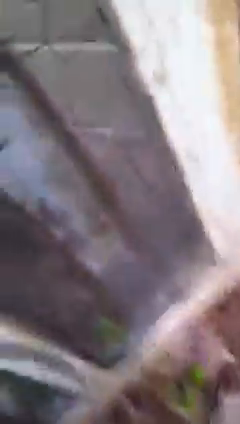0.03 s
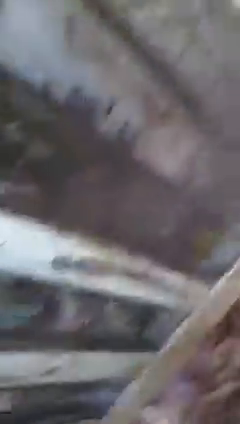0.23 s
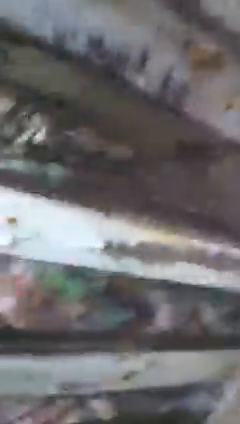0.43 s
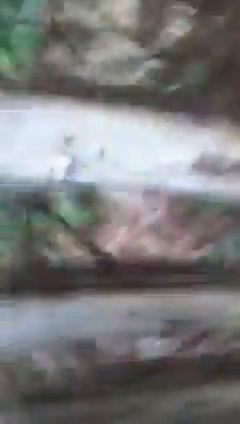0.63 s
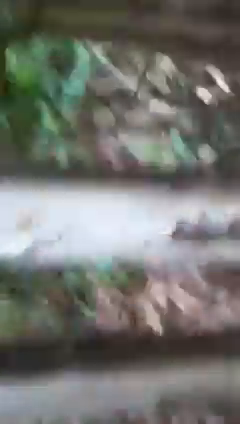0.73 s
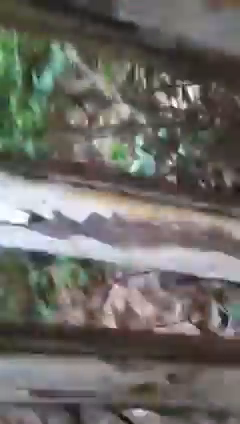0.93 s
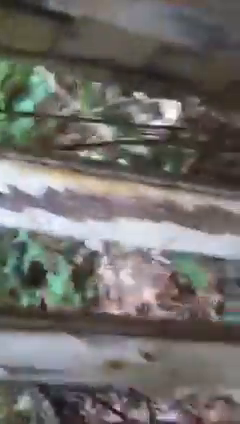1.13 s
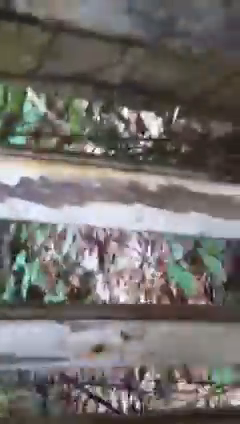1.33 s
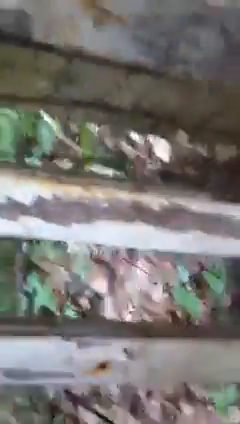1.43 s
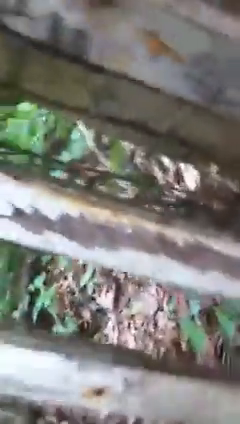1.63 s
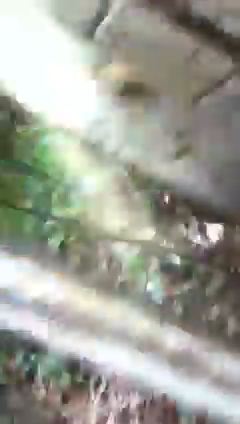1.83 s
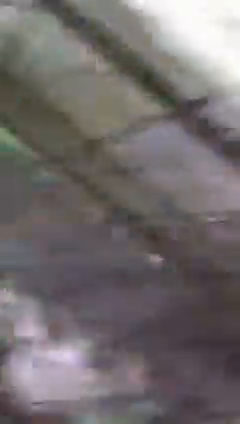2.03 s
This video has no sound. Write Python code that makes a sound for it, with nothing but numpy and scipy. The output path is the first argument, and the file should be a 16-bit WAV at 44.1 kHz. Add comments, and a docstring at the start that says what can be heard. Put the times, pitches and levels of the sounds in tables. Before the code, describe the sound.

Handling noise right at the microphone: a hand knocks dully on a small camera, then slides over it in hissing strokes that brighten and stop dead. A few tiny ticks follow over quiet outdoor air.

```python
"""A hand shifts its grip on a small camera, right at the microphone, beside wooden boards outdoors.
The case takes a quick cluster of dull knocks, then skin or cloth slides over it in hissing strokes;
the last stroke crosses the microphone opening, turns bright and stops dead. A few tiny ticks follow.
Behind it all lies quiet open air: distant rumble, faint swells of rustling and one brief soft scuff."""
import sys
import numpy as np
from scipy import signal
from scipy.fft import irfft
from scipy.io import wavfile

SR = 44100
rng = np.random.default_rng(int(sys.argv[2]) if len(sys.argv) > 2 else 0)


def generate_wav(signal):
    """Clip the signal to [-1, 1] and save it as 16-bit WAV at the path in sys.argv[1]."""
    frames = np.transpose(np.atleast_2d(signal))
    scaled = np.clip(frames, -1, 1) * 32767
    pcm = np.round(scaled).astype(np.int16)
    wavfile.write(sys.argv[1], SR, pcm)


N = 92610
TIME = np.arange(N) / SR
HZ = np.fft.rfftfreq(N, 1 / SR)


def amp(db):
    """Decibels to gain."""
    return 10 ** (np.asarray(db) / 20)


def unit(x):
    """Scales to rms 1."""
    return x / np.sqrt(np.mean(x ** 2) + 1e-20)


def spectrum(points):
    """Joins points of frequency and dB by lines over log frequency."""
    hz, db = np.transpose(points)
    return np.interp(np.log(HZ + 1), np.log(hz + 1), db)


def noise(db):
    """Noise of rms 1 with the given spectrum."""
    return unit(irfft(amp(db) * np.exp(2j * np.pi * rng.random(len(HZ))), N))


def swell(peak, rise, release, db):
    """An envelope that climbs 20 dB to its peak over the rise and drops 20 dB over the release."""
    away = np.maximum((peak - TIME) / rise, (TIME - peak) / release)
    return amp(db - 20 * away ** 1.88)


def add(mix, start, sound):
    """Mixes a sound in at a start in seconds."""
    part = mix[max(round(start * SR), 0):][:len(sound)]
    part += sound[:len(part)]


def cut(x, hz, kind, order):
    """A low-pass or high-pass filter."""
    return signal.sosfilt(signal.butter(order, min(hz, SR / 3), kind, fs=SR, output="sos"), x)


def outdoors():
    """Open air: distant rumble, soft hiss, faint swells of rustling and a brief scuff at two seconds."""
    # Spectra of the air and the rustle. Each row: frequency in Hz, relative level in dB.
    air = [(15, -76), (25, -44), (48, -41), (71, -14.5), (107, -6.5), (156, 0), (240, -8.5), (274, -8.5),
           (495, -13.5), (631, -12.5), (1710, -22), (3260, -26.5), (5730, -26.5), (6380, -30),
           (15500, -36.5)]
    rustle = [(200, -27), (1000, 3), (2000, -0.5), (2900, -3.5), (4300, -3), (6200, -3), (9000, -8),
              (16000, -8)]
    # Two slow rustles, then the scuff. Each row: peak time, rise and release in seconds, level in dB.
    swells = [(0.92, 0.72, 0.25, -66), (2.1, 0.67, 1, -68.5), (2.002, 0.012, 0.044, -64)]
    return amp(-57) * noise(spectrum(air)) + noise(spectrum(rustle)) * sum(swell(*row) for row in swells)


def rubbing():
    """Skin or cloth rubs the case, brighter and more resonant the nearer the microphone opening."""
    # Friction on the case, near the opening and right over it.
    # Each row: frequency in Hz, relative level in dB.
    dull_rub = [(30, -50), (70, -6.5), (130, -3.5), (340, 1), (560, -9), (1100, -14.5), (1450, -14.5),
                (2200, -25.5), (2650, -21), (3100, -26), (3800, -28.5), (4300, -32), (7500, -38.5),
                (10000, -37), (13000, -51), (16000, -55)]
    near_rub = [(30, -40), (70, -19), (130, 0.5), (250, -4.5), (500, -10.5), (1350, -13.5), (2100, -20.5),
                (4400, -22.5), (5500, -30), (7500, -35.5), (10200, -32), (12500, -45), (16000, -38)]
    bright_rub = [(30, -45), (80, -29.5), (190, -5), (380, -5), (490, -11), (700, -5.5), (1080, -4),
                  (1350, -7.5), (2200, -10), (3200, -12), (5900, -15), (7500, -24), (11000, -24),
                  (16000, -36)]
    # Narrow resonances of the opening. Each row: centre and width in Hz, lift in dB.
    opening = [(1043, 115, 7), (1165, 67, 2), (2540, 47, 9.5), (3660, 70, 7), (4000, 44, 10),
               (4865, 64, -2), (5520, 80, 14)]
    # Running rustle of the grip. Each row: time in seconds, level in dB.
    grip = [(0, -56), (.06, -60.5), (.11, -51.5), (.15, -62.5), (.19, -51.5), (.27, -45.5), (.32, -50),
            (.37, -49), (.42, -41), (.57, -47), (.79, -49), (.83, -73), (.9, -101)]
    # Sliding strokes. Each row: time of greatest pressure, rise and release in seconds, level in dB,
    # brightness from 0 (on the case) to 1 (over the opening).
    strokes = [(.216, 0.019, 0.011, -43, 0.4), (.226, 0.0054, 0.0079, -35.5, 0.8),
               (0.448, 0.0058, 0.064, -35.5, 0), (0.499, 0.065, 0.043, -32, 0.02),
               (0.615, 0.022, 0.026, -41, 0.47), (0.67, 0.026, 0.066, -32, 0.42),
               (0.697, 0.042, 0.035, -27.5, 0.52), (0.736, 0.042, 0.017, -33.5, 0.6),
               (0.766, 0.026, 0.016, -26.5, 1), (.778, 0.019, 0.0045, -26.5, 1)]
    # Rasp of the first long slide. Each row: band centre and width in Hz, relative level in dB.
    rasp_bands = [(1430, 550, 4), (2860, 1170, 0)]
    grain_hz, grain_db = 694, 1.5

    dull, near = spectrum(dull_rub), spectrum(near_rub)
    resonances = sum(db / (1 + (2 * (HZ - hz) / width) ** 2) for hz, width, db in opening)
    bright = spectrum(bright_rub) + resonances
    out = noise(dull) * amp(np.interp(TIME, *np.transpose(grip)))
    for peak, rise, release, db, brightness in strokes:
        to_near = np.clip(2 * brightness, 0, 1)
        to_bright = np.clip(2 * brightness - 1, 0, 1)
        colour = dull + to_near * (near - dull) + to_bright * (bright - near)
        out += swell(peak, rise, release, db) * noise(colour)
    rasp = sum(amp(db) / (1 + (2 * (HZ - hz) / width) ** 4) for hz, width, db in rasp_bands)
    out += swell(peak=0.5, rise=0.07, release=0.0679, db=-44) * noise(20 * np.log10(rasp))
    grain = noise(-20 * np.log10(1 + (HZ / grain_hz) ** 2))
    slips = unit(amp(grain_db * grain))  # the surfaces catch and slip
    return cut(out * slips, hz=73, kind="high", order=5)


def ticks():
    """Tiny dry snaps close to the microphone; the longer one rings, the narrower its band."""
    # Each row: start in seconds, level in dB, band centre in Hz, decay in seconds.
    snaps = [(0.092, -44.5, 1850, 0.00094), (0.2316, -31.5, 7900, 0.00028), (0.265, -49, 6000, 0.00052),
             (0.3005, -54, 6000, 0.00088), (0.337, -51, 9300, 0.0014), (0.433, -46, 4810, 0.0021),
             (.5893, -37, 7900, 0.00054), (.735, -36, 9000, 0.00051), (0.9052, -55, 5900, 0.0026),
             (1.1374, -60, 10100, 0.0043), (1.137, -60, 2080, 0.0055), (1.263, -58, 5600, 0.0032)]
    sharp_octaves, sharp_s = 0.51, 0.00092  # half-width of the band for a decay this short
    out, t = np.zeros(N), TIME[:SR // 20]
    for start, db, hz, decay in snaps:
        octaves = sharp_octaves * np.sqrt(sharp_s / decay)
        band = -10 * np.log10(1 + (np.log2((HZ + 1) / hz) / octaves) ** 4)
        fade = np.exp(-t / decay)
        snap = fade * noise(band)[:len(t)]
        add(out, start, amp(db) * snap * np.linalg.norm(fade) / np.linalg.norm(snap))
    return out


def knocks():
    """Each blow cracks and rings the case around the microphone; a softer contact is duller."""
    # Blows on the case. Each row: start in seconds, gain in dB, treble edge in Hz.
    blows = [(0.1, -47, 513), (0.208, -17.5, 1120), (.2100, -14.5, 795), (0.2209, -10, 2800),
             (0.2217, -5, 900), (0.2277, -1, 1800), (0.2432, -17.5, 295), (0.4442, -18, 1110),
             (0.616, -25.5, 1800), (0.701, -25, 700), (0.781, -28, 500)]
    # Modes of the case. Each row: frequency in Hz, relative level in dB, seconds to fall 60 dB.
    modes = [(131.8, -19.5, 0.099), (246.2, -25.5, 0.12), (341.5, -1.5, 0.02), (462.6, -33.5, 0.11),
             (700, -15, .012), (1090, -16.5, 0.007), (1554, -20.5, 0.016), (2820, -19.5, 0.0054)]
    crack_db, crack_s = -8, 0.000083  # the contact itself
    out, t = np.zeros(N), TIME[:SR // 4]
    ring = sum(amp(db - 60 * t / t60) * np.sin(2 * np.pi * hz * t) for hz, db, t60 in modes)
    crack = cut(amp(crack_db) * np.exp(-t / crack_s), hz=5200, kind="low", order=4)
    for start, db, edge_hz in blows:
        add(out, start, -amp(db) * cut(ring + crack, edge_hz, "low", order=2))
    return cut(out, hz=95, kind="high", order=4)  # the knocks carry little deep bass


def thuds():
    """A soft fingertip press flexes the case for two or three slow cycles."""
    # Each row: middle of the press in seconds, level in dB, pitch in Hz.
    presses = [(0.128, -42, 135), (0.214, -20, 149), (.264, -29, 194), (0.448, -26, 176),
               (0.6259, -23.5, 166), (0.8, -42, 140), (1.016, -47.5, 146)]
    half_press_s = 0.0073
    out = np.zeros(N)
    for middle, db, hz in presses:
        t = TIME - middle
        out += amp(db) * np.exp(-(t / half_press_s) ** 2) * np.sin(2 * np.pi * hz * t)
    return out


def brushes():
    """The lightest touches reach the microphone only as a thin high hiss."""
    # Spectrum of the hiss. Each row: frequency in Hz, relative level in dB.
    hiss = [(100, -37), (1500, -8), (3200, 1.5), (6500, -7), (8200, -8), (9300, 3), (10900, -4.5),
            (12500, -12), (16000, -11)]
    # Light touches. Each row: peak time, rise and release in seconds, level in dB.
    touches = [(0.187, 0.033, .028, -58), (0.226, .011, 0.0027, -60), (.28, .07, 0.1, -65),
               (.511, 0.029, 0.037, -52), (.635, 0.076, .06, -53.5)]
    return noise(spectrum(hiss)) * sum(swell(*row) for row in touches)


def shudders():
    """A dragging finger keeps the main resonance of the case ringing at a wavering pitch."""
    # Each row: peak time, rise and release in seconds, level in dB, pitch in Hz.
    drags = [(0.303, 0.015, 0.015, -38, 373.7), (0.375, 0.022, 0.026, -35.5, 364),
             (.399, 0.009, 0.014, -35.5, 327), (.424, 0.023, 0.0091, -41, 290)]
    width_hz, waver_depth, fuzz_gain = 117, 0.115, 0.57
    out = np.zeros(N)
    for peak, rise, release, db, hz in drags:
        waver = noise(-20 * np.log10(1 + (HZ / width_hz) ** 2))
        pitch = hz * (1 + waver_depth * waver)
        tone = np.sin(2 * np.pi * np.cumsum(pitch) / SR)
        fuzz = noise(-20 * np.log10(1 + ((HZ - hz) / width_hz) ** 4))
        out += unit(tone + fuzz_gain * fuzz) * swell(peak, rise, release, db)
    return out


def scene():
    """Handling sounds right at the microphone over the open air, in mono."""
    return (knocks() + thuds() + rubbing() + shudders() + brushes() + ticks() + outdoors())[None]


def record(dry):
    """The camera's sound stops steeply at the top of the treble."""
    edge_hz = 15750
    low_pass = signal.firwin(511, edge_hz, window=("kaiser", 9), fs=SR)
    return signal.oaconvolve(dry, low_pass[None], "same")


dry = scene()
out = record(dry)
generate_wav(out)
```